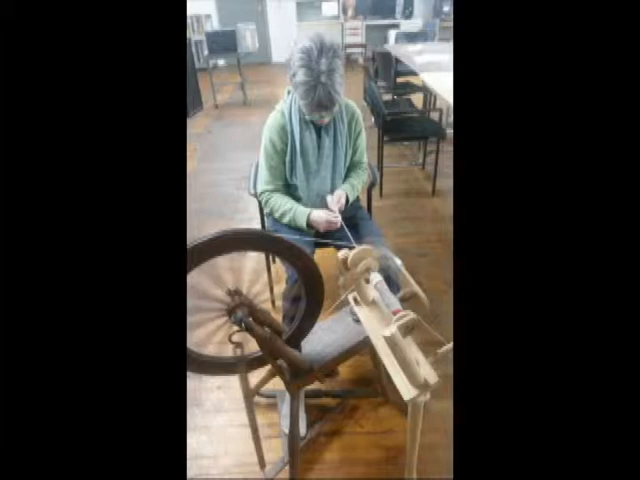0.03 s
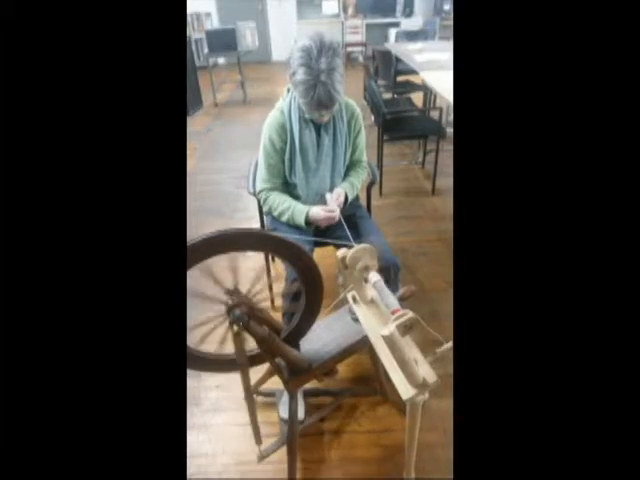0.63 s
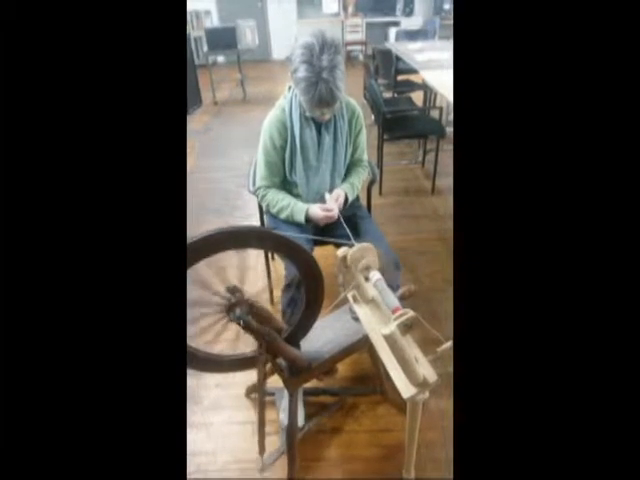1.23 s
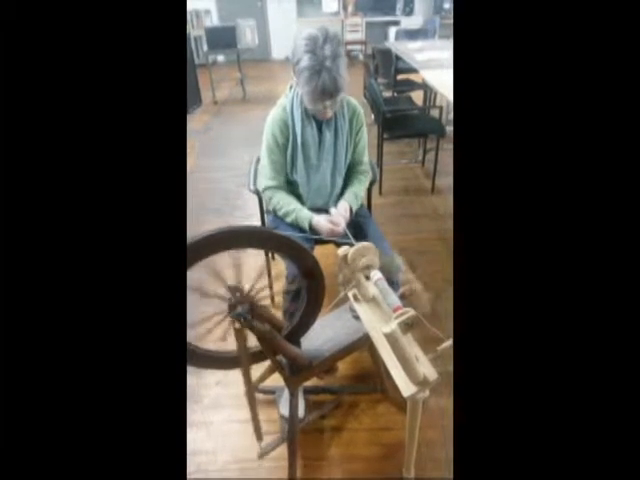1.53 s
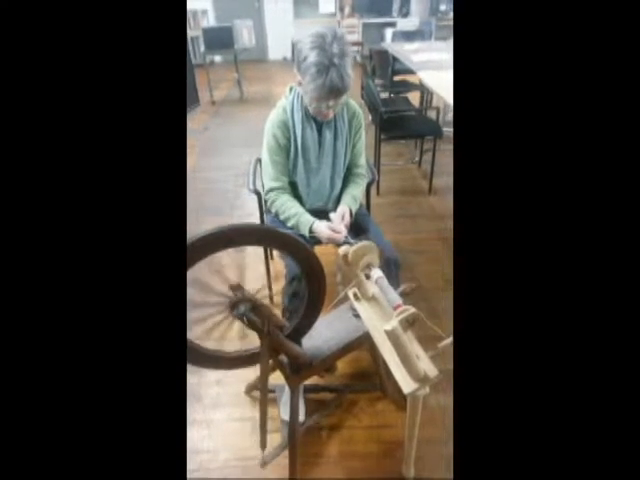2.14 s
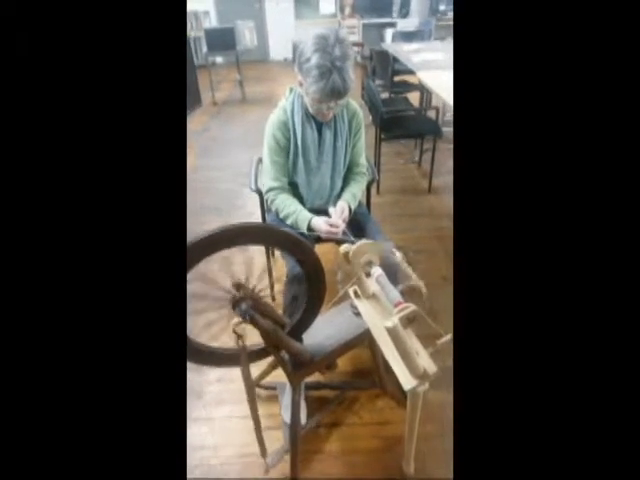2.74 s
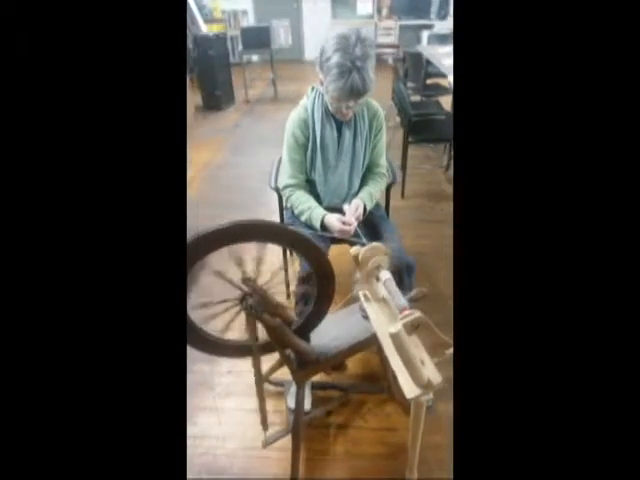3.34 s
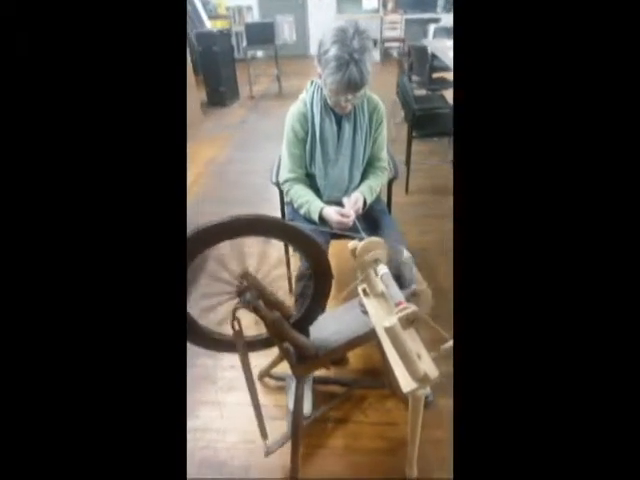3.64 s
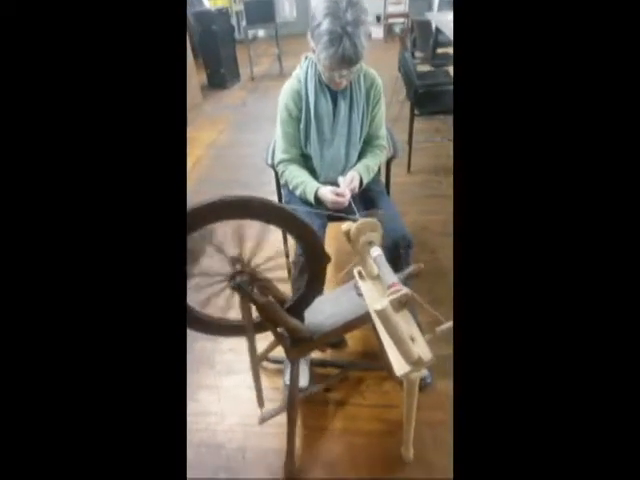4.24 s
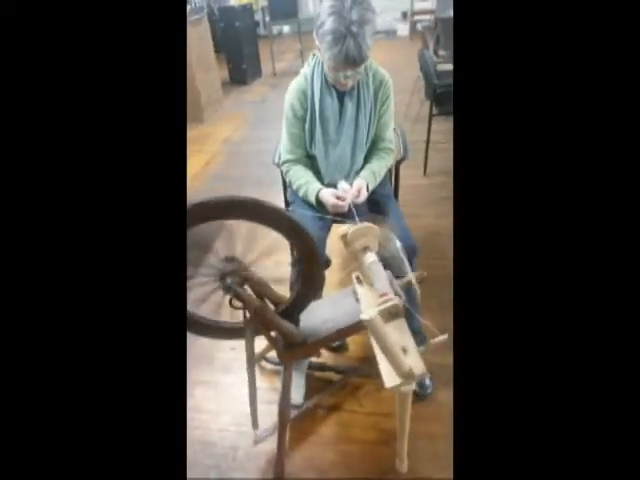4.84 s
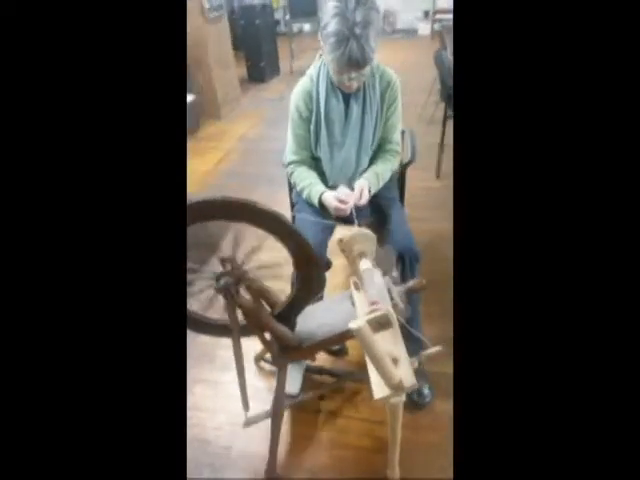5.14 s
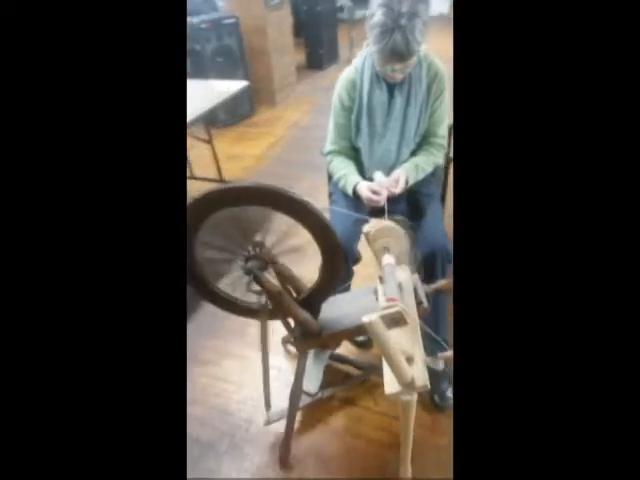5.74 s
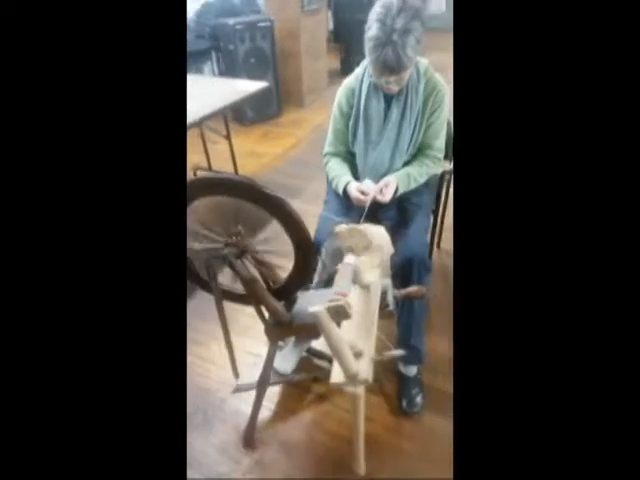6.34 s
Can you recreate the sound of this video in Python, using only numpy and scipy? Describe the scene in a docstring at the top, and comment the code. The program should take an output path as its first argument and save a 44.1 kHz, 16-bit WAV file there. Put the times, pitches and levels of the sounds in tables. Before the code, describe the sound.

A wooden spinning wheel whirs softly in slow surges, with small ticks, squeaks and knocks over a low room hum.

```python
"""A treadle spinning wheel turns in a quiet workshop with a wooden floor.
Each push surges the wheel and the flyer geared to it: band and bearings whir, wool rustles in step.
Bearings squeak, fibres snap, loose joints tick, the treadle knocks; later yarn rubs and soles scuff.
Mains hum and ventilation fill the room. The microphone is carried round to the flyer;
each of its two ports rings in its own treble range."""
import sys
import numpy as np
from scipy import signal
from scipy.fft import rfft, irfft
from scipy.io import wavfile

SR = 44100
rng = np.random.default_rng(int(sys.argv[2]) if len(sys.argv) > 2 else 0)


def waveform_to_disk(signal):
    """Save audio, clipped to [-1, 1], as 16-bit WAV at the path in sys.argv[1]."""
    frames = np.transpose(np.atleast_2d(signal))
    scaled = np.clip(frames, -1, 1) * 32767
    samples = np.round(scaled).astype(np.int16)
    wavfile.write(sys.argv[1], SR, samples)


N = 281799
TIME_S = np.arange(N) / SR


def from_db(db):
    """Decibels to gain."""
    return 10 ** (np.asarray(db) / 20)


def unit_rms(x):
    """Scale to rms 1."""
    return x / np.sqrt(np.mean(x ** 2) + 1e-20)


def over_bins(points):
    """Interpolate a table over log frequency at every Fourier bin."""
    hz, value = np.transpose(points)
    return np.interp(np.log(np.arange(N // 2 + 1) * SR / N + 1), np.log(hz), value)


def coloured(x, spectrum):
    """Shape by a gain table; rms 1."""
    return unit_rms(irfft(rfft(x) * from_db(over_bins(spectrum)), N))


def drift(rate_hz):
    """Slow random wander; rms 1."""
    hop, settle = 40, 2000
    r = np.exp(-2 * np.pi * rate_hz * hop / SR)
    slow = signal.lfilter([1], [1, -2 * r, r * r], rng.standard_normal(N // hop + settle + 2))[settle:]
    return np.interp(np.arange(N) / hop, np.arange(len(slow)), unit_rms(slow))


def ring(x, hz, t60_s):
    """Damped mode: a unit impulse starts a sine of height 1."""
    r, w = from_db(-60 / (t60_s * SR)), 2 * np.pi * hz / SR
    return signal.lfilter([0, np.sin(w)], [1, -2 * r * np.cos(w), r * r], x + 1e-18)


def resonance(x, hz, width_hz, passes=1):
    """Two-pole band-pass, peak gain 1."""
    r, w = np.exp(-np.pi * width_hz / SR), 2 * np.pi * hz / SR
    for _ in range(passes):
        x = signal.lfilter(np.array([1, 0, -1]) * (1 - r * r) / 2, [1, -2 * r * np.cos(w), r * r], x)
    return x


def band_pass(x, low_hz, high_hz):
    """Flat-topped band-pass."""
    return signal.sosfilt(signal.butter(2, [low_hz, high_hz], "band", fs=SR, output="sos"), x)


def grains(per_s, spread_db):
    """Tiny slips at random moments, with a separate strength on each side; rms 1."""
    sizes = from_db(spread_db * np.minimum(rng.exponential(1, N), 4))
    return unit_rms((rng.random(N) < per_s / SR) * sizes * rng.standard_normal((2, N)))


def contact(start_s, t60_s=0.013):
    """Short rough touch: its sample span and a decaying stereo burst of unit energy."""
    at = round(start_s * SR)
    t = np.arange(min(SR // 10, N - at)) / SR
    burst = rng.choice([-1, 1], (2, len(t))) * from_db(-60 * t / t60_s)
    return slice(at, at + len(t)), burst / np.sqrt(np.sum(burst ** 2, axis=1, keepdims=True))


def swell(turns, depth_db, late_turns=0):
    """Level in dB that rises and falls once a turn."""
    return depth_db * np.cos(2 * np.pi * (turns - late_turns))


# Treadle pushes, one per wheel turn: fastest_s, push_db, wool_draw_db
PUSHES = [(0.18, 2, 2), (1.09, -1, 1), (1.999, -1, -0.5), (2.95, -1.5, 0.5), (3.87, 0.5, 2.5),
          (4.825, -1, -1.5), (5.744, -4, -3), (6.68, -0.5, -3)]

def wheel_motion(speed_swing=0.14, flyer_ratio=5.238):
    """The wheel surges with each push and drives the flyer."""
    fastest_s, push_db, draw_db = np.transpose(PUSHES)
    turns = np.interp(TIME_S, fastest_s, np.arange(len(PUSHES)))
    surged_turns = turns + speed_swing * np.sin(2 * np.pi * turns) / (2 * np.pi)
    flyer_turns = 0.578 + flyer_ratio * surged_turns
    push_db, draw_db = (np.interp(TIME_S, fastest_s, db) for db in (push_db, draw_db))
    return turns, flyer_turns, push_db, draw_db


# Frame modes, wood below 3 kHz and metal pins above, also struck by joint_ticks: pitch_hz, gain_db, t60_s
FRAME_MODES = [(1004, -10, 0.014), (1338, -3.5, 0.064), (1450, -7.5, 0.069), (1623, 2, 0.028),
               (1862, -4, 0.075), (2165, -5, 0.028), (2780, -3, 0.022), (3290, -9.5, 0.13),
               (3630, -4, 0.031), (3940, -1, 0.04), (4180, -5, 0.044), (4630, -17, 0.061)]
# Friction spectrum: frequency_hz, gain_db
FRICTION_SPECTRUM = [(30, -18), (150, -12.5), (350, 2.5), (700, -12.5), (1100, -45), (2000, -7), (3200, -9),
                     (4800, -9), (5500, -13), (14500, -24.5)]

def whir(friction_db):
    """Band and bearings slip in dense grains and set the frame ringing."""
    slips = grains(per_s=7000, spread_db=1) * from_db(2.5 * drift(32))
    frame = sum((-1) ** k * from_db(db) * resonance(slips, hz, width_hz=67)
                for k, (hz, db, _) in enumerate(FRAME_MODES))
    frame = resonance(frame, hz=1380, width_hz=290)  # the heavy frame favours its lower modes
    return from_db(friction_db) * (coloured(slips, FRICTION_SPECTRUM) + from_db(-4) * unit_rms(frame))


# Flyer and steel spindle modes: pitch_hz, width_hz, gain_db
FLYER_MODES = [(1325, 30, -13.5), (1373, 22, -9.5), (1420, 28, -13), (1613, 22, -15.5), (3454, 70, -17),
               (3510, 38, -12.5)]

def flyer_ring(friction_db):
    """Bearing friction keeps flyer and spindle ringing faintly."""
    slips = grains(per_s=800, spread_db=2)
    modes = sum(from_db(db) * unit_rms(resonance(slips, hz, width)) for hz, width, db in FLYER_MODES)
    return from_db(friction_db) * modes


def axle_murmur(friction_db):
    """The heavy wheel rolls on its axle and softly shakes the frame."""
    slips = grains(per_s=900, spread_db=0.5)
    murmur = resonance(slips + slips.mean(axis=0), hz=491, width_hz=480, passes=2)
    return from_db(friction_db - 2) * unit_rms(murmur)


# Wool spectrum: frequency_hz, gain_db
WOOL_SPECTRUM = [(100, -36), (1500, 1), (3000, -7), (4500, -5), (6000, -1.5), (8500, 3), (12000, 7),
                 (14500, -3)]

def wool_rustle(level_db, clump_db=2.8):
    """Fibres slide past each other in clumps."""
    fibres = coloured(grains(per_s=6000, spread_db=1.5), WOOL_SPECTRUM)
    return fibres * from_db(level_db + clump_db * np.tanh(drift(23)))


# Mains and fan motor lines: pitch_hz, gain_db, left_minus_right_db
HUM_LINES = [(55.9, -14.5, 0), (119.9, 0, -2), (232.2, -20, -2), (240.1, -12.3, -6), (296.1, -22, 0),
             (336.2, -20, 0), (351.9, -22, -2), (475.1, -31, -2), (515.5, -23, -2), (664.8, -23, -1),
             (838.4, -30, -5), (1234, -31, 1), (1252.4, -22, 1)]
# Mains hum along the microphone's path: time_s, level_db
MAINS_LEVEL = [(0.5, -53), (0.64, -61.5), (0.9, -51), (1.08, -56), (1.23, -52), (1.67, -55), (1.78, -54),
               (2.55, -54.5), (2.63, -58.5), (2.78, -54.5), (3.33, -53.5), (3.47, -55), (3.8, -52.5),
               (4.85, -52), (4.96, -51), (5.3, -50), (5.77, -45), (5.93, -42.5), (6.0, -49.5), (6.23, -43),
               (6.37, -47.5)]

def hum(port_lag_s=0.0002):
    """Mains and fan lines; higher ones waver more as the microphone crosses their standing waves."""
    mains_db = np.interp(TIME_S, *np.transpose(MAINS_LEVEL))
    motor_db = -52.5 + 0.69 * (mains_db - mains_db.mean())
    arrival_s = TIME_S - np.array([[0], [port_lag_s]])
    out = np.zeros((2, N))
    for k, (hz, line_db, pan_db) in enumerate(HUM_LINES):
        base_db = mains_db if k == 1 else motor_db  # line 1 is the main hum
        waver = np.sqrt(hz / 500)
        phase = 2 * np.pi * (hz * arrival_s + rng.random()) + 0.79 * waver * drift(0.99)
        level_db = base_db + line_db + 3 * waver * drift(4.6) + drift(15.3)
        pan = from_db([[pan_db / 2], [-pan_db / 2]])
        out += np.sqrt(2) * from_db(level_db) * np.sin(phase) * pan
    return out


# Room field, left against right: frequency_hz, correlation
ROOM_CORRELATION = [(60, 0.82), (170, 0.79), (350, 0.76), (700, 0.13), (1000, 0.016), (1400, -0.16),
                    (3000, 0.094), (14000, 0.019)]

def diffuse_noise():
    """Noise spread by the room: alike on both sides in the bass, unrelated in the treble."""
    alike = over_bins(ROOM_CORRELATION)
    mid, side = rfft(rng.standard_normal((2, N)))
    return irfft(np.sqrt(1 + alike) * mid + np.sqrt(1 - alike) * side * [[1], [-1]], N)


# Air noise spectrum: frequency_hz, gain_db
AIR_SPECTRUM = [(10, -59), (22, -12), (42, -9.5), (55, -2.5), (80, -1), (120, -2.5), (190, 1), (260, -4.5),
                (350, -4.5), (500, -11), (750, -12.5), (1100, -12.5), (2300, -19.5), (14500, -34)]

def ventilation(air_db, rumble_db):
    """Smooth air noise fills the room and excites a low room mode, alike at both ports."""
    air = coloured(diffuse_noise(), AIR_SPECTRUM)
    rumble = resonance(rng.standard_normal(N + SR), hz=56.3, width_hz=4, passes=2)[SR:]
    return from_db(air_db) * air + from_db(rumble_db) * unit_rms(rumble)


# Bearing squeaks: start_s, level_db, pitch_hz, t60_s
SQUEAKS = [(0.452, -52.5, 1655, 0.08), (0.836, -56.5, 4200, 0.033), (2.537, -59, 3480, 0.24),
           (4.655, -61, 3495, 0.3), (4.745, -56, 2800, 0.048), (6.11, -46.5, 1672, 0.036)]

def bearing_squeaks(rise_s=0.0081, sag_per_s=0.017):
    """A bearing sticks and slips: a thin, unsteady chirp that sags slightly in pitch."""
    out = np.zeros((2, N))
    waver = 1 + 0.0018 * drift(41)
    roughness = from_db(2 * drift(60))
    for start_s, db, hz, t60_s in SQUEAKS:
        age_s = np.maximum(TIME_S - start_s, 0)
        envelope = (1 - np.exp(-age_s / rise_s)) * from_db(-60 * np.minimum(age_s / t60_s, 3))
        phase = 2 * np.pi * hz * np.cumsum(waver - sag_per_s * np.minimum(age_s, t60_s)) / SR
        out += from_db(db) * envelope / envelope.max() * roughness * [np.sin(phase), np.cos(phase)]
    return out


# Fibre snaps: start_s, strength_db
SNAPS = [(0.4574, -41.5), (1.113, -45), (1.161, -43), (1.272, -45), (1.34, -54), (1.565, -44), (1.64, -52),
         (1.811, -46), (1.956, -39.5), (2.0523, -37.5), (2.119, -41), (2.161, -45), (2.73, -46),
         (2.934, -42), (3.034, -51), (3.508, -46), (3.559, -49), (3.66, -45), (3.82, -42), (3.836, -41),
         (3.859, -39), (4.799, -41), (4.9495, -42), (6.1077, -40.5), (6.297, -48)]

def fibre_snaps(gain_db=12.5):
    """Single fibres snap free with a bright click."""
    out = np.zeros((2, N))
    for start_s, db in SNAPS:
        span, burst = contact(start_s)
        out[:, span] += from_db(db + gain_db) * burst
    return resonance(out, hz=9100, width_hz=5500, passes=2)


# Loose joint clicks: start_s, strength_db, tilt_db_per_octave
TICKS = [(0.459, -49, -1.5), (0.607, -56, -8), (1.007, -53, 1), (1.1187, -53.5, -18), (1.154, -55, 0),
         (1.278, -53.5, -11), (1.352, -63, 4.5), (1.418, -51, -13), (1.611, -50.5, -5), (1.636, -57, -0.5),
         (1.811, -54, 6.5), (1.955, -40, -3.5), (2.0521, -45.5, -3.5), (2.219, -54, -18), (2.96, -58.5, 4),
         (3.832, -56, 2.5), (4.1875, -48.5, -6.5), (4.594, -62, 2), (4.707, -59, -1), (4.949, -57, 5.5),
         (6.107, -50.5, 2)]

def joint_ticks(rebound_s=0.009, rebound_db=-4, ring_db=-6, crack_db=30):
    """Joints strike the frame's modes and bounce once; harder contacts favour the high modes."""
    rebounds = [(start_s + rebound_s, db + rebound_db, tilt) for start_s, db, tilt in TICKS]
    out = np.zeros((2, N))
    for start_s, db, tilt in TICKS + rebounds:
        span, burst = contact(start_s)
        t = TIME_S[:burst.shape[1]]
        for hz, mode_db, t60_s in FRAME_MODES:
            tone = rng.choice([-1, 1], (2, 1)) * np.sin(2 * np.pi * hz * t) * from_db(-60 * t / t60_s)
            crack = resonance(burst, hz, width_hz=154)
            gain = from_db(db + mode_db + tilt * np.log2(hz / 1500))
            out[:, span] += gain * (from_db(ring_db) * tone + from_db(crack_db) * crack)
    return band_pass(out, low_hz=940, high_hz=5400)


# Treadle and footman knocks: start_s, strength_db, pitch_hz, t60_s
KNOCKS = [(0.904, -30, 268, 0.022), (0.905, -44, 458, 0.017), (0.927, -44, 266, 0.13),
          (1.266, -39, 164, 0.045), (4.246, -38.5, 118, 0.16), (4.263, -43.5, 493, 0.025),
          (4.89, -43.5, 204, 0.069), (5.05, -37.5, 800, 0.0074), (5.06, -37, 530, 0.023),
          (5.846, -27, 252, 0.013), (5.847, -25, 109.5, 0.084), (5.875, -41.5, 347, 0.057),
          (5.985, -34.5, 1010, 0.0064), (6.3825, -28.5, 734, 0.013)]

def treadle_knocks(overtone_ratio=1.25, overtone_db=-10.5):
    """Soft blows ring a damped mode and a weaker overtone; the wood radiates no deep bass."""
    out = np.zeros(N)
    for start_s, db, hz, t60_s in KNOCKS:
        impulse = np.zeros(N)
        impulse[round(start_s * SR)] = -from_db(db)
        overtone = from_db(overtone_db) * ring(impulse, hz * overtone_ratio, t60_s / 2)
        out += resonance(ring(impulse, hz, t60_s) + overtone, hz, width_hz=2 * hz)
    return band_pass(out, low_hz=44, high_hz=1490)


# Spurts of yarn drag: centre_s, length_s, strength_db
SPURTS = [(4.69, 0.046, -3), (4.8, 0.12, 1), (4.95, 0.094, -0.5), (5.08, 0.1, 1), (5.23, 0.14, 1),
          (5.37, 0.079, -5.5)]

def yarn_rub(level_db, slack_hz=3473, taut_hz=3710, rise_s=0.065, width_hz=470, grit_db=-7.5):
    """Yarn drags over a flyer hook: a narrow, breathy scrape, rising in pitch as it pulls taut."""
    tension = 1 - np.exp(-np.maximum(TIME_S - SPURTS[0][0], 0) / rise_s)
    drag_power = sum(from_db(2 * db) * np.exp(-(2 * (TIME_S - centre_s) / length_s) ** 2)
                     for centre_s, length_s, db in SPURTS)
    pitch_hz = slack_hz + (taut_hz - slack_hz) * tension + 39.2 * drift(8)
    low_pass = signal.butter(2, width_hz / 2, fs=SR, output="sos")
    slips = signal.sosfilt(low_pass, rng.standard_normal((2, 2, N)))
    phase = 2 * np.pi * np.cumsum(pitch_hz) / SR
    scrape = slips[0] * np.cos(phase) - slips[1] * np.sin(phase)
    grit = resonance(grains(per_s=1500, spread_db=-2), hz=4800, width_hz=1800)
    grit = resonance(grit, hz=3900, width_hz=1800)
    envelope = from_db(level_db + drift(25)) * np.sqrt(drag_power)
    return envelope * (unit_rms(scrape) + from_db(grit_db) * unit_rms(grit))


# Scuffs on the floorboards: centre_s, length_s, level_db
SCUFFS = [(5.052, 0.094, -59.5), (5.365, 0.023, -62), (5.974, 0.22, -60.5)]

def sole_scuffs():
    """A sole grates briefly over the boards, swelling and fading."""
    grit = grains(per_s=430, spread_db=-1.5)
    pressure = sum(from_db(db) * np.exp(-(2 * (TIME_S - centre_s) / length_s) ** 2)
                   for centre_s, length_s, db in SCUFFS)
    return pressure * unit_rms(resonance(grit + grit.mean(axis=0), hz=660, width_hz=810, passes=2))


def reflections(x, t60_s=0.39, delay_s=0.006, wall_hz=5100):
    """Diffuse workshop reverberation, dulled by the walls."""
    t = TIME_S[:SR]
    tail = diffuse_noise()[:, :SR] * from_db(-60 * t / t60_s) * (t > delay_s)
    tail = signal.lfilter(*signal.butter(1, wall_hz, fs=SR), tail)
    return signal.fftconvolve(x, unit_rms(tail) / np.sqrt(SR), axes=1)[:, :N]


def scene(walk_s=(4, 5.53)):
    """The wheel close by, the room around it."""
    turns, flyer_turns, push_db, draw_db = wheel_motion()
    near = np.interp(TIME_S, walk_s, [0, 1])  # 1 = microphone beside the flyer
    friction_db = -65 + 4.5 * near + push_db + swell(turns, 3.5, late_turns=0.089)
    rustle_db = -69.5 + 8 * near + draw_db + swell(turns, 2.5) + swell(flyer_turns, 2)
    rustle_db += swell(2 * flyer_turns, 1.3, late_turns=-0.044)  # both flyer arms tug the yarn
    room = hum() + ventilation(air_db=-55 + 3 * near, rumble_db=-66 + 5 * near)
    turning = whir(friction_db) + flyer_ring(friction_db) + axle_murmur(friction_db)
    clicks = joint_ticks() + bearing_squeaks()
    thuds = treadle_knocks() + sole_scuffs()
    yarn = yarn_rub(level_db=-62.5) + wool_rustle(rustle_db) + fibre_snaps()
    reverb = reflections(from_db(-8) * clicks + from_db(-9) * thuds)
    return turning + yarn + clicks + thuds + reverb + room


# Left microphone port resonances: centre_hz, width_hz, gain_db
LEFT_PORT = [(3700, 98, 0.5), (4040, 1270, 3.5), (4780, 150, -3.5)]
# Right microphone port resonances: centre_hz, width_hz, gain_db
RIGHT_PORT = [(8690, 180, 6.4), (9880, 2220, 5.6), (11840, 530, 1.1)]

def record(dry, start_s=0.3681, fade_s=0.11, cutoff_hz=14500):
    """Each port adds its resonances; the sound fades in from silence; the top is cut."""
    heard = np.array([x + sum(from_db(db) * resonance(x, hz, width) for hz, width, db in port)
                      for x, port in zip(dry, (LEFT_PORT, RIGHT_PORT))])
    fade_in = np.clip((TIME_S - start_s) / fade_s, 0, 1)
    return signal.sosfilt(signal.ellip(12, 0.1, 80, cutoff_hz, fs=SR, output="sos"), heard * fade_in)


dry = scene()
out = record(dry)
waveform_to_disk(out)
```